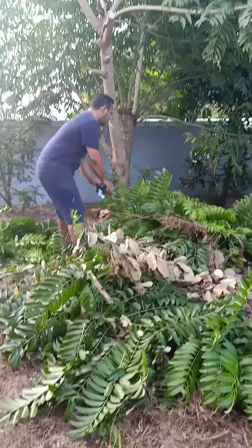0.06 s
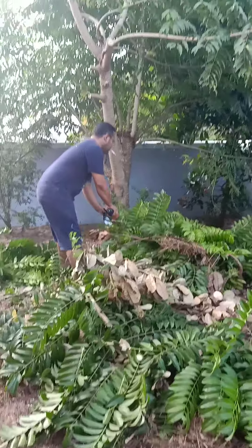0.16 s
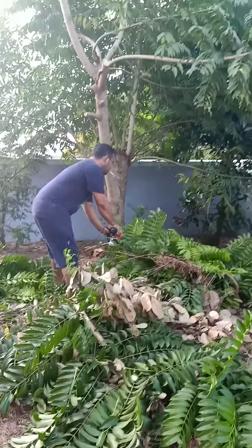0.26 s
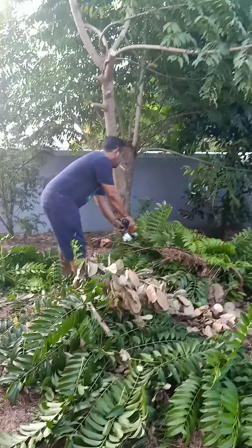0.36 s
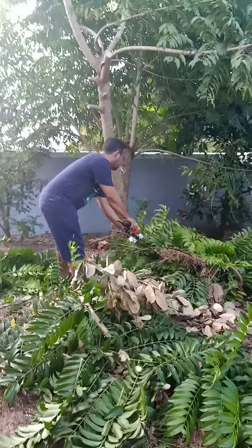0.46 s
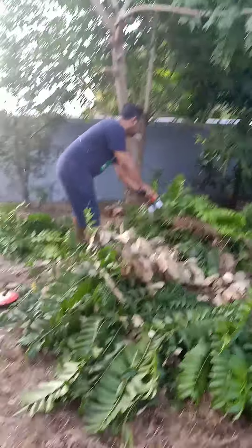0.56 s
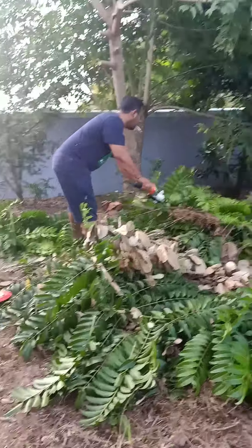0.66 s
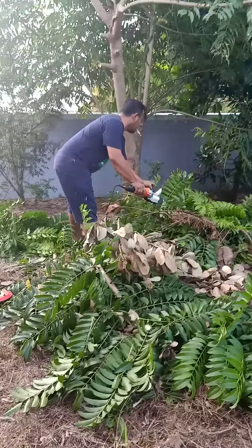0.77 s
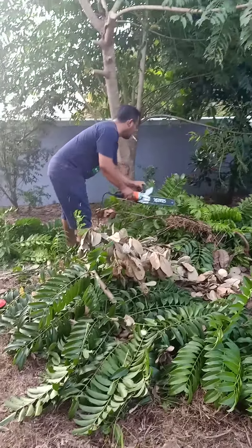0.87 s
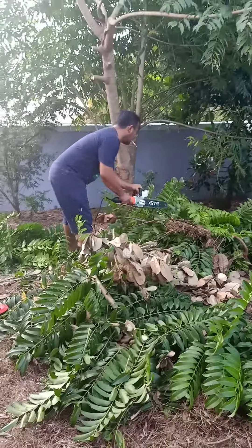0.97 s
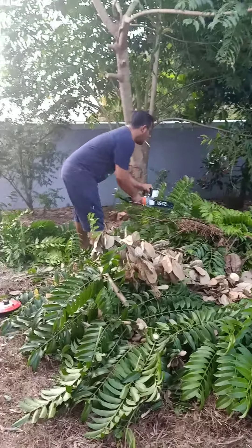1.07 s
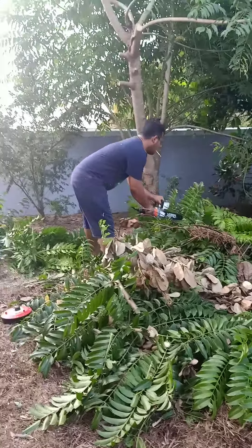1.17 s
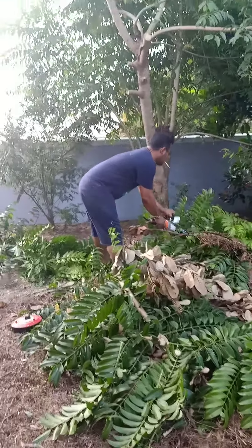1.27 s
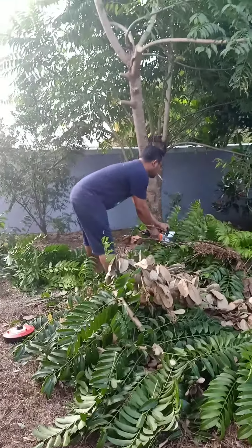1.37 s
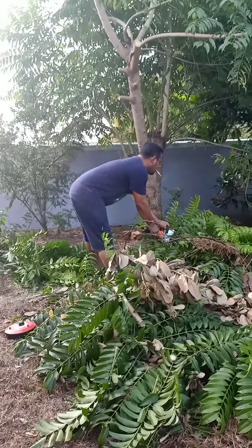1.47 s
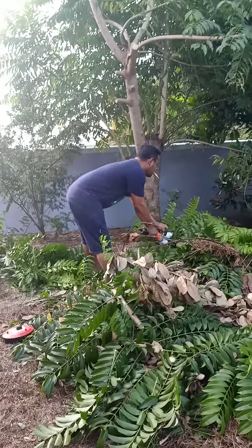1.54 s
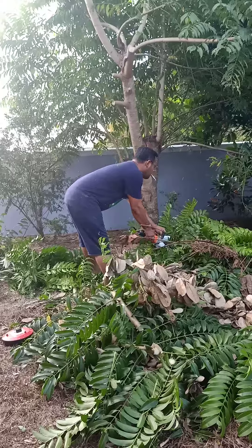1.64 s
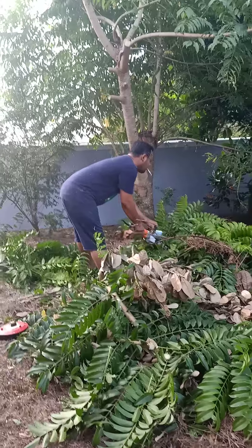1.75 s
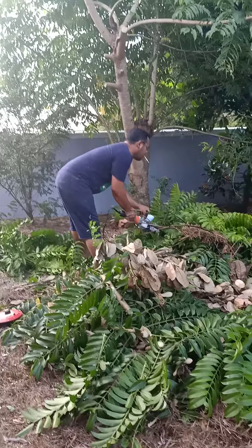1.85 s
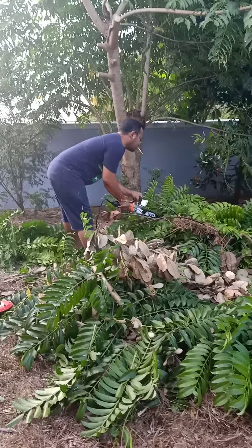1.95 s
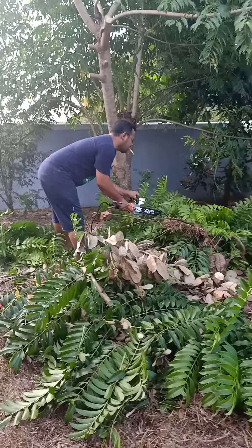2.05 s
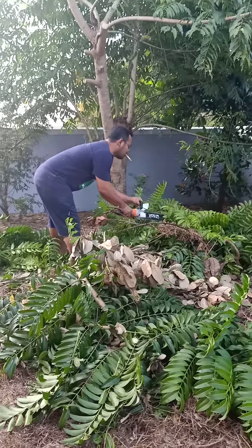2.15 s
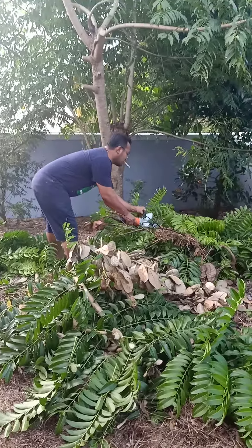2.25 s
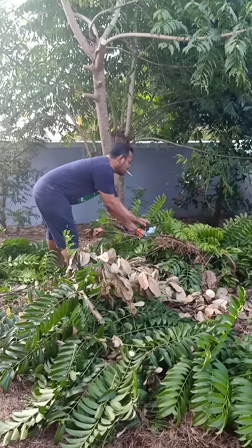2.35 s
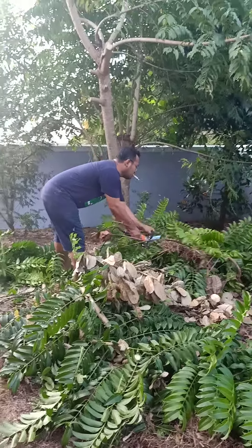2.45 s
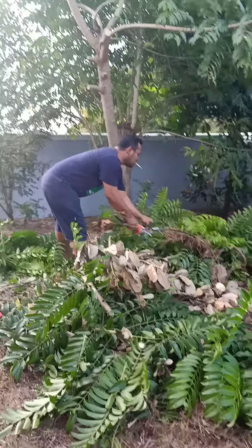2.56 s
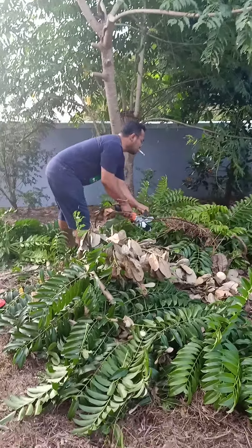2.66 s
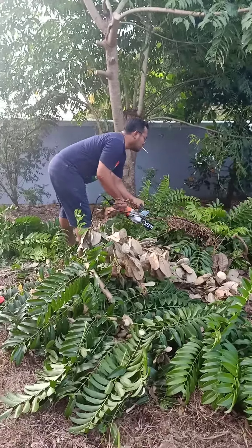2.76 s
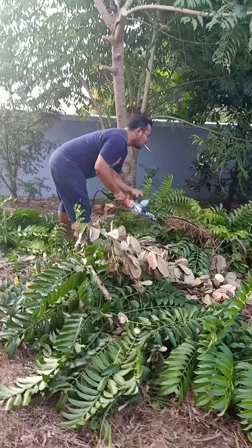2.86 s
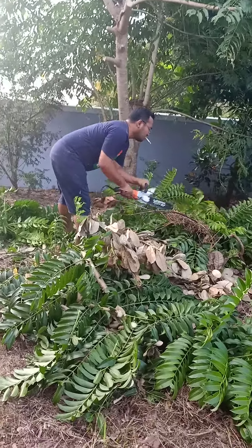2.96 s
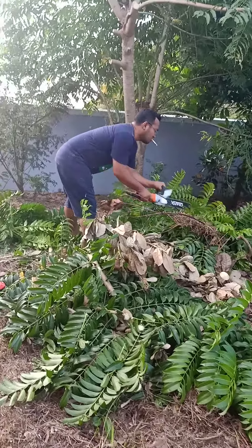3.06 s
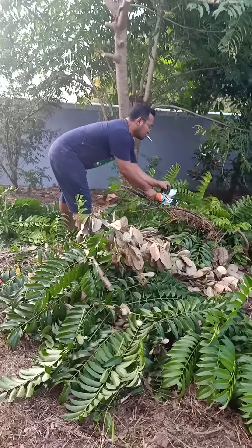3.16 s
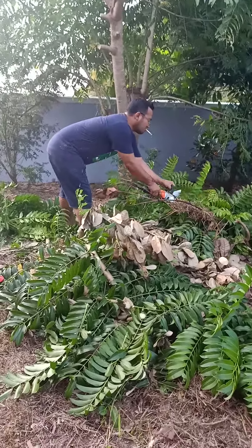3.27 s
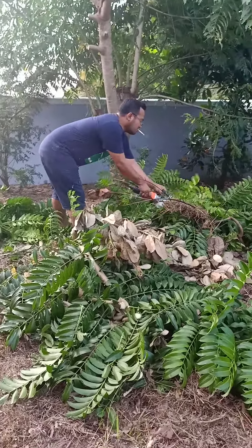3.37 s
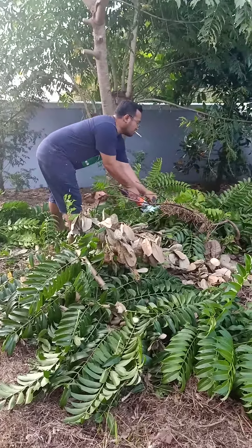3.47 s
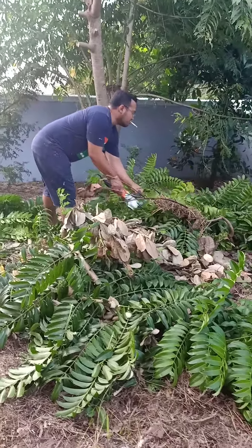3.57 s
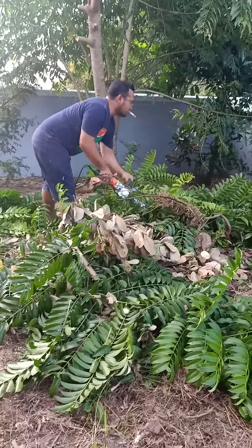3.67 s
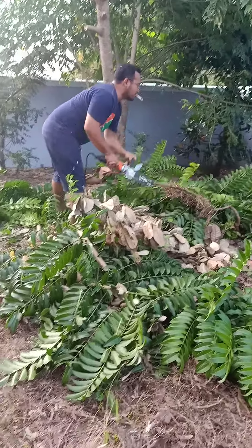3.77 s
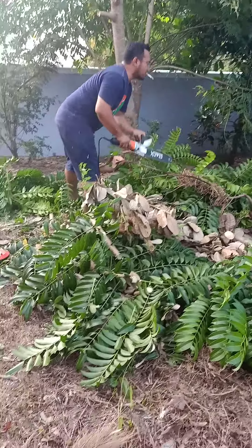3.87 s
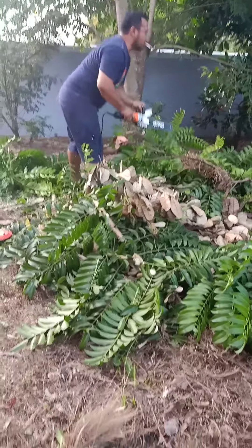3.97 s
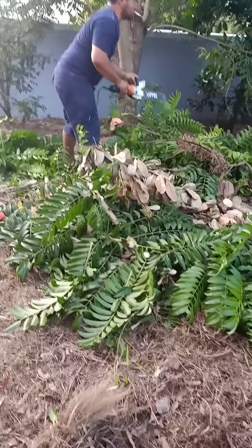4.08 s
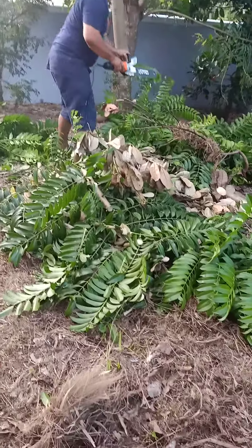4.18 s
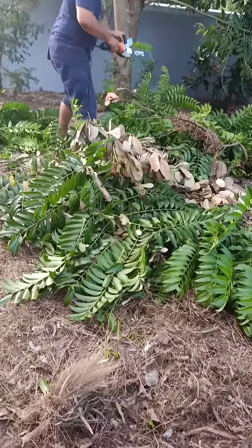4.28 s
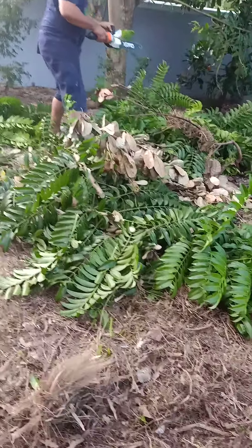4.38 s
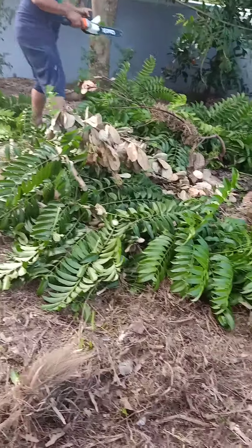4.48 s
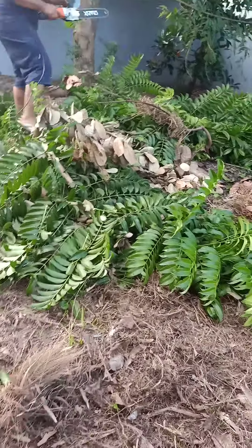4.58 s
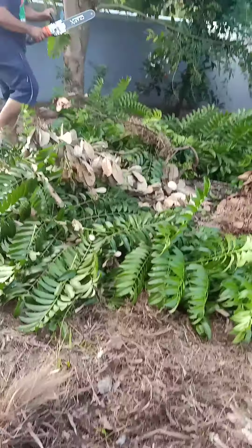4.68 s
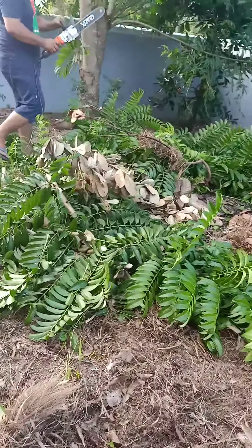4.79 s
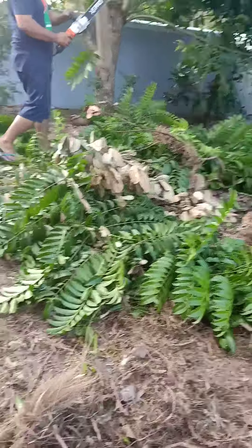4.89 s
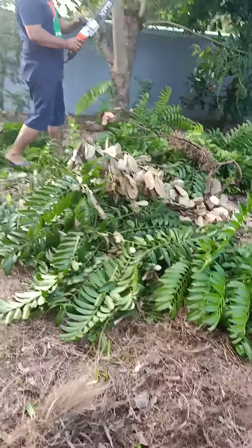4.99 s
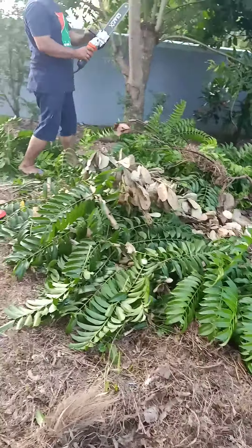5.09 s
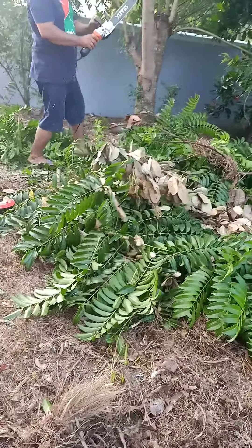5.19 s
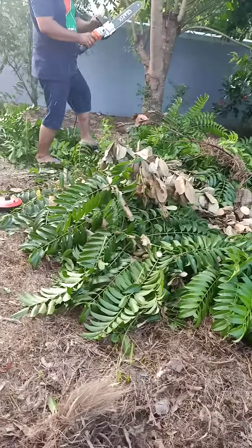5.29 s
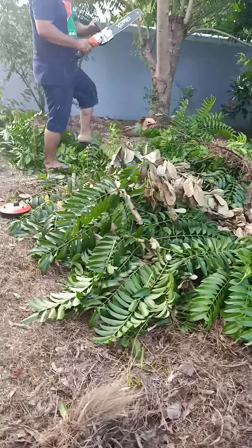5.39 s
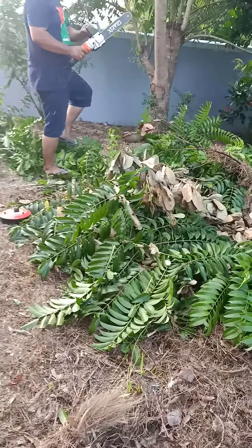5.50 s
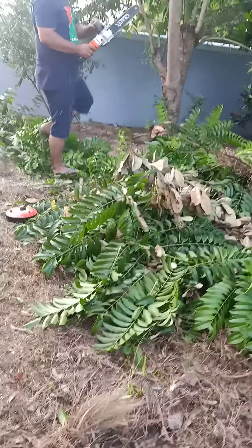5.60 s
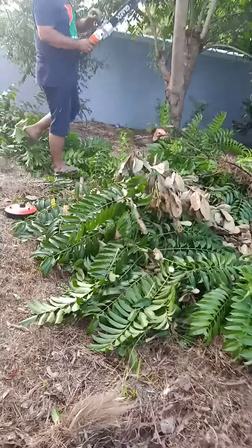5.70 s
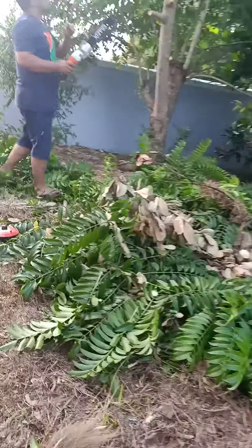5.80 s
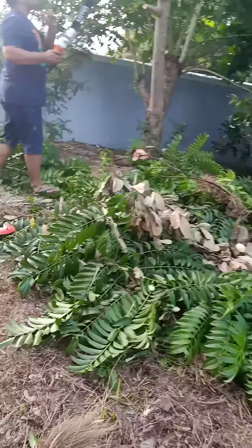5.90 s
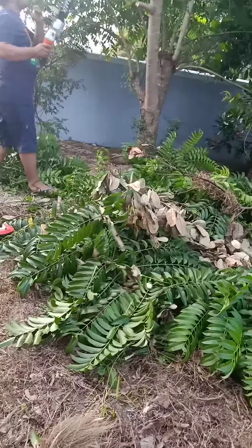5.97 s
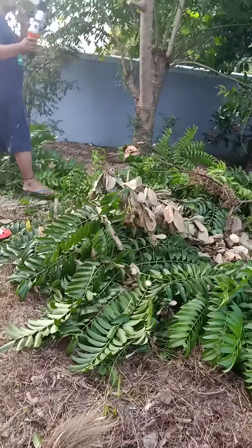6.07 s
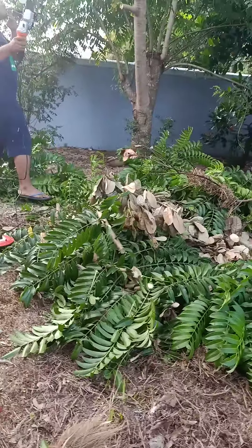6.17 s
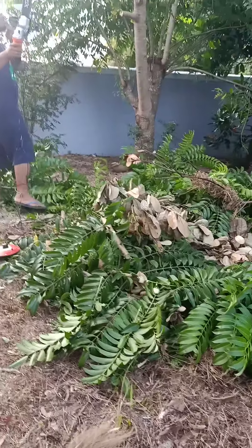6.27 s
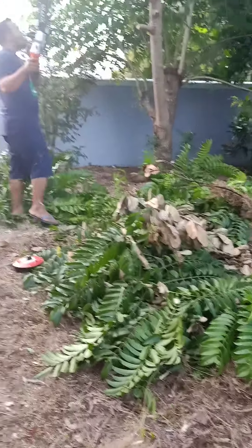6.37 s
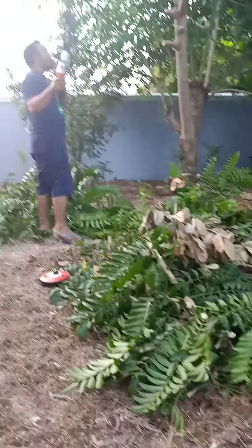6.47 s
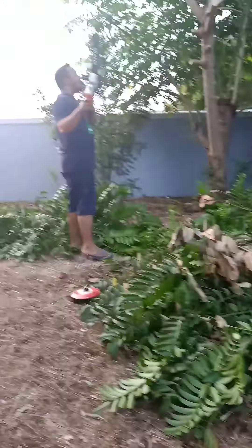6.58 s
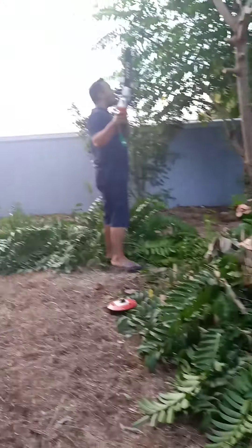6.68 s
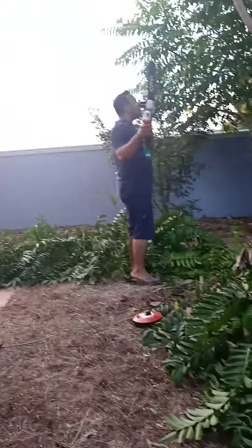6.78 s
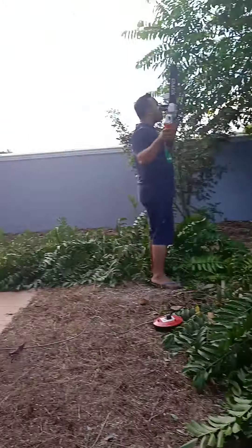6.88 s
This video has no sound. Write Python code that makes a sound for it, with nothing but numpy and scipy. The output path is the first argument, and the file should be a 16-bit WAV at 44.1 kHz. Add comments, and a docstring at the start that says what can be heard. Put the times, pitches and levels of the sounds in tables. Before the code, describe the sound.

Outdoors, a few metres from the microphone, a small electric chainsaw whines and rattles, making several short cuts through branches that knock and snap. After about four seconds the power is cut and the chain coasts, falling in pitch until it stops. Quiet footsteps crunch on leaves meanwhile, and a few faint bird chirps follow. Far traffic hums throughout, and a garden wall returns short echoes.

```python
"""In a walled garden, a small electric chainsaw cuts leafy branches a few metres away.
Its motor whines and slows in each cut, while the chain rattles round the steel bar and the teeth
chop at the wood. Then the trigger is let go and the saw coasts to a stop. Branches knock, twigs snap,
feet crunch on leaves and, near the end, birds whistle. Distant traffic hums all the while.
The wall and the leaves send the sound back as short echoes."""
import sys
import numpy as np
from scipy import signal
from scipy.fft import rfft, irfft, next_fast_len
from scipy.io import wavfile
from scipy.ndimage import map_coordinates

SR = 44100
rng = np.random.default_rng(int(sys.argv[2]) if len(sys.argv) > 2 else 0)


def generate_wav(signal):
    """Clip the signal to [-1, 1] and save it as 16-bit WAV at the path in sys.argv[1]."""
    frames = np.transpose(np.atleast_2d(signal))
    scaled = np.clip(frames, -1, 1) * 32767
    pcm = np.round(scaled).astype(np.int16)
    wavfile.write(sys.argv[1], SR, pcm)


N = 306054

# Levels in the tables are relative: filters and the mix still turn them up or down.
# Garden air and far traffic. Each row: frequency in Hz, level in dB.
AIR_SPECTRUM = [(25, -20), (55, -8), (92, 4), (130, 1), (300, -2.5), (550, -4), (900, -9), (1300, -15),
                (2300, -10), (4000, -22.5), (5800, -24), (7300, -14.5), (10000, -27.5), (15000, -42)]
# How alike the air sounds left and right. Each row: frequency in Hz, likeness (1 is the same).
AIR_LIKENESS = [(60, 1), (300, 0.86), (700, 0.48), (2000, 0.085), (6000, 0.071)]
# Distant engines. Each row: start and end in seconds, pitch in Hz, level in dB.
ENGINE_HUMS = [(0, 7, 107, -71), (0, 7, 200, -74), (.33, .97, 146, -64), (6.3, 7, 266, -65.5),
               (6.3, 7, 533, -72.5), (5, 6.3, 432, -71.5), (6.52, 6.85, 441, -70)]
# Bird notes. Each row: start and length in seconds, first and last pitch in Hz, level in dB,
# delay of the left side in milliseconds.
BIRD_NOTES = [(6.255, .03, 2550, 2300, -65, -.07), (6.275, .04, 2000, 1980, -66, -.07),
              (6.32, .055, 1500, 1850, -62, .2), (6.35, .04, 1880, 1990, -55, .16),
              (6.354, .045, 2000, 3150, -60, -.07), (6.378, .06, 1900, 1520, -61, .2),
              (6.385, .05, 3150, 2750, -60.5, -.07), (6.428, .04, 2550, 2780, -65, -.07),
              (6.452, .045, 2950, 3070, -61.5, -.07), (6.505, .035, 2420, 2200, -63, 0),
              (6.53, .05, 3400, 3850, -67, .04), (6.57, .045, 2200, 2360, -60, 0),
              (6.592, .03, 4050, 3350, -68, .04), (6.615, .035, 3250, 4050, -66, .04),
              (6.724, .046, 1950, 2420, -54, -.07), (6.752, .028, 2400, 2700, -57, -.07),
              (6.802, .015, 2350, 2480, -49, -.07), (6.808, .028, 2480, 3150, -56.5, -.05),
              (6.827, .04, 3170, 3020, -60, -.05)]
# Steps on fallen leaves. Each row: middle and half length in seconds, level in dB.
FOOTSTEPS = [(4.42, 0.11, -54), (4.74, 0.098, -58), (5.37, 0.09, -55.5), (5.944, 0.13, -57)]
# Branches knocking as they give way. Each row: start in seconds, level in dB, pitch in Hz.
BRANCH_KNOCKS = [(0.948, -45, 251), (1.517, -38.5, 346), (2.449, -42, 334), (2.58, -39, 311),
                 (3.419, -43, 414.7), (3.558, -40, 309.8)]
# Twigs and dry leaves snapping. Each row: start in seconds, level in dB.
TWIG_SNAPS = [(3.9114, -42), (3.952, -38), (6.0843, -58), (6.546, -47), (6.5614, -50)]

# How long the garden echoes. Each row: frequency in Hz, seconds to fade by 60 dB.
ECHO_TIMES = [(200, 0.077), (2000, 0.32), (12000, 0.33)]
# What wall and leaves send back. Each row: frequency in Hz, level in dB.
ECHO_SPECTRUM = [(200, -26), (700, -2.5), (2000, 1), (5000, 7), (12000, 4)]
# First echoes off ground, trunk and wall. Each row: delay in milliseconds, level in dB.
ECHO_PATHS = [(1.4, -7), (5.2, -13), (11, -7), (16, -6), (27, -10.5)]
# The saw moves to the right. Each row: time in seconds, delay of the left side in milliseconds.
SAW_DIRECTION = [(0, 0.028), (2.8, 0.017), (3.7, 0.036), (4.3, 0.16), (4.7, 0.25), (5.7, 0.2), (6.3, 0.18)]
# Each microphone opening rings in its own way. Each row: frequency in Hz, left minus right in dB.
MIC_BALANCE = [(300, -0.5), (650, 0), (900, -3), (1250, -2.5), (1650, 1.5), (2100, 0), (3500, -0.5),
               (5200, 0.5), (7100, 5.5), (8000, 3.5), (9000, -9.5), (10200, -2), (11300, -4), (12800, 1)]

# The tone colours of five things that get struck. Each row: frequency in Hz, level in dB.
WOOD_SPECTRUM = [(100, -44.5), (200, -11.5), (330, -5.5), (520, -5.5), (650, -7.5), (820, 1), (1100, 1),
                 (1700, -3.5), (3000, -21.5)]  # branches and twigs
HOUSING_SPECTRUM = [(300, -32.5), (620, -21.5), (760, -17), (1200, -15), (1500, -10), (1720, -4),
                    (1950, -1), (2350, 1.5), (2900, -1.5), (3350, -10), (3800, -8.5), (4500, -10.5),
                    (5600, -18), (8000, -39.5)]  # the plastic housing
STEEL_SPECTRUM = [(2500, -33), (3300, -13), (3800, -5.5), (4500, -5.5), (5400, -10.5), (6300, -7.5),
                  (7200, -2), (8600, -1), (9800, -5.5), (11200, -5.5), (12600, -11), (13500, -6),
                  (14800, -17.5), (15600, -5.5)]  # the chain on the steel bar
SLACK_SPECTRUM = [(2800, -36), (3400, -11.5), (3850, -2.5), (4400, -23.5), (7400, -4), (8500, 1),
                  (9200, -5.5), (10200, -25)]  # the bar, rung by the slack chain as it coasts
GEAR_SPECTRUM = [(400, -24), (850, -9), (1150, -1.5), (1450, -0.5), (2100, 3), (3400, -2.5), (4800, -3.5),
                 (5650, -4), (7100, -2), (10000, -26.5)]  # the gears under power
# Narrow bands where bar and cover ring. Each row: frequency and width in Hz, boost in dB.
SAW_RESONANCES = [(740, 36, 4), (1143, 43, -4), (1395, 51, 4.5), (1643, 54, 3), (1717, 32, 4.8),
                  (1810, 90, -0.5), (2316, 32, 2.5), (2350, 64, 1), (2950, 79, 1), (3710, 200, 1.2),
                  (5530, 300, -1), (7178, 110, 2), (7650, 300, -1), (10130, 200, 2.5)]
# The chain rasps on a twig or chatters in its groove.
# Each row: middle and half length in seconds, frequency and width in Hz, level in dB.
CHAIN_RASPS = [(0.434, .045, 1550, 900, -39), (1.05, 0.085, 2400, 800, -34), (1.64, .035, 950, 600, -42.5),
               (2.637, 0.024, 2040, 400, -31), (2.645, 0.018, 1663, 200, -38),
               (2.996, .04, 1750, 180, -37.5), (3.44, 0.03, 1250, 702.7, -43),
               (3.665, .02, 2379, 250.1, -36.5), (5.165, .018, 2050, 600, -46),
               (5.315, 0.019, 2550, 400, -45.5), (5.759, .018, 1900, 597.6, -48),
               (5.816, 0.022, 2196, 600, -55), (6.144, .02, 1706, 130, -61)]
# The steel sizzles as the flat of the bar swings towards the listener.
# Each row: middle and half length in seconds, level in dB.
BAR_SIZZLES = [(.97, .06, -43), (3.03, 0.034, -39.5), (3.99, 0.097, -35), (4.71, 0.068, -40)]
# The saw is dipped, lifted and turned. Each row: time in seconds, change of rattle and of hiss in dB.
CHAIN_TURNING = [(0, -3, 1), (.25, -1.5, -1.8), (.43, -.7, 1.5), (.8, 0.5, 0.3), (1, 0.9, 0.5),
                 (1.25, -0.7, -0.3), (1.58, -0.5, 0.5), (1.76, -2.5, -0.5), (2.03, -1.6, 1.2),
                 (2.5, 1.2, 0.5), (2.64, -1.2, -0.7), (2.76, -0.5, 0.5), (3.03, 0, 1.5), (3.3, 0, -0.5),
                 (3.55, -0.8, -0.4), (3.76, 1, 0.9), (3.99, 1, 1.3), (4.17, 0.5, 0.5), (4.5, -2, 1),
                 (4.8, 1.8, 2), (5.15, -2.2, 0), (5.6, -3.5, 0), (5.95, .6, 1.5), (6.08, -.3, -1),
                 (6.22, -3, -1)]
# Gritty gear tones. Each row: multiple of the shaft speed, level at full speed in dB.
GEAR_PARTIALS = [(3.65, -51), (5.0, -47), (5.3, -49.5), (6.25, -49.5)]
# Three motor tones swell and sink as the saw is turned. Each row: time in seconds, level in dB.
SHAFT_LEVELS = [(0, -63), (.25, -61), (.54, -54.5), (.75, -64), (.98, -53), (1.12, -60), (1.3, -58),
                (1.45, -66), (1.68, -67), (1.82, -55), (2, -62), (2.6, -58.5), (3.03, -56), (3.38, -58.5),
                (3.52, -64), (3.72, -55.5), (4, -56), (4.23, -49.5), (4.4, -57)]  # one wave per turn of the shaft
OCTAVE_LEVELS = [(.06, -55), (.17, -48), (.3, -47), (.53, -47.5), (.66, -63), (.88, -60), (1.03, -50.5),
                 (1.25, -54), (1.5, -59), (1.8, -52.5), (2.15, -50), (2.5, -51.5), (2.85, -48), (3.12, -62),
                 (3.35, -47.5), (3.55, -57), (4.15, -54.5), (4.35, -60)]  # two waves per turn
WHISTLE_LEVELS = [(0, -47), (.27, -41), (.45, -48), (.6, -48), (.72, -41), (.88, -43), (1.02, -39.5),
                  (1.15, -45), (1.35, -40.5), (1.7, -52), (2.0, -44), (2.2, -42), (2.34, -45), (2.42, -36),
                  (2.56, -49), (2.74, -48), (2.87, -40), (3.15, -42), (3.35, -39.5), (3.6, -51),
                  (3.95, -42), (4.2, -43)]  # the commutator, the motor's spinning contact
# Weaker motor tones. Each row: multiple of the shaft speed, level against the octave in dB.
MOTOR_OVERTONES = [(3, -4), (12, -3)]
# The chain meets a branch and drags the motor down. Each row: start and length in seconds,
# speed lost in turns per second, recovery time in seconds, strength of the bite in dB.
BRANCH_CUTS = [(-.5, .15, 16, 0.75, -38), (0.34, .13, 13.4, 1.24, -42.5), (1.37, 0.13, 3.3, 0.29, -51),
               (1.512, 0.19, 23.5, 0.66, -49.5), (2.171, 0.23, 5, 0.57, -64),
               (2.466, .12, 18.8, 0.84, -41.5), (3.402, .18, 17, 0.64, -43.5)]

FREE_HZ = 471.3  # shaft turns per second when nothing is being cut
RELEASE_S, STOP_S = 4.18, 6.3  # the trigger is let go; the coasting ends


def amp(db):
    """Turn decibels into a gain."""
    return 10 ** (np.asarray(db) / 20)


def unit(x):
    """Scale a sound to an average power of 1."""
    return x / np.sqrt(np.mean(x ** 2) + 1e-20)


def clock():
    """The time of every sample in seconds."""
    return np.arange(N) / SR


def along(points, hz):
    """Read between the rows of a (frequency, value) table, on a log frequency scale."""
    freqs, values = np.transpose(points)
    return np.interp(np.log(hz + 1), np.log(freqs + 1), values)


def curves(rows):
    """Join timed rows with straight lines: one curve for each column after the time."""
    times, *columns = np.transpose(rows)
    return [np.interp(clock(), times, column) for column in columns]


def wobble(rate):
    """A smooth random curve through `rate` random points a second."""
    knots = rng.standard_normal(int(N * rate / SR) + 4)
    fine = signal.resample(knots, 10 * len(knots))
    return unit(np.interp(clock() * rate * 10, np.arange(len(fine)), fine))


def swell(middle, half_length, db):
    """A bell-shaped rise and fall of gain."""
    return amp(db) * np.exp(-((clock() - middle) / half_length) ** 2)


def phase(hz):
    """The running angle of a wave whose pitch changes."""
    return 2 * np.pi * np.cumsum(hz) / SR


def filtered(x, response):
    """Filter x; `response` gives the gain at each frequency."""
    size = next_fast_len(N + SR // 2)
    return irfft(rfft(x, size) * response(np.fft.rfftfreq(size, 1 / SR)), size)[..., :N]


def resonance(f, hz, width_hz):
    """How something that rings at `hz` responds to the frequencies f."""
    return 1j * f * width_hz / (hz * hz - f * f + 1j * f * width_hz)


def band(x, hz, width_hz):
    """Pass x through a steep resonance; the result has power 1."""
    return unit(filtered(x, lambda f: resonance(f, hz, width_hz) ** 2))


def body(x, spectrum):
    """Let x ring an object with the given tone colour; the result has power 1."""
    size = 4096
    hz = np.fft.rfftfreq(size, 1 / SR)
    gain = amp(along(spectrum, hz)) * np.clip(hz / spectrum[0][0], 1e-2, 1)
    # folding the cepstrum makes the ring come after each blow, never before it
    cepstrum = irfft(np.log(gain))
    cepstrum[1:size // 2] *= 2
    cepstrum[size // 2 + 1:] = 0
    ring = irfft(np.exp(rfft(cepstrum)))
    return unit(signal.fftconvolve(x, ring)[:N])


def impacts(rate, scatter, size_db, sliding):
    """Uneven blows, `rate` a second, each a short scrape, over a share of steady sliding noise."""
    count = np.cumsum(rate) / SR
    beats = np.arange(1, int(count[-1]))
    at = np.interp(beats + scatter * rng.standard_normal(len(beats)), count, np.arange(N)).astype(int)
    sizes = amp(size_db * rng.standard_normal(len(at)))
    energy = np.bincount(at, sizes ** 2 / rate[at], N)
    energy = signal.lfilter([1], [1, -np.exp(-1 / (0.00028 * SR))], energy)
    return np.sqrt(sliding + (1 - sliding) * energy / energy.mean()) * rng.standard_normal(N)


def air():
    """A soft outdoor rush, with engines droning far away."""
    def colour(hz):
        spread = np.arccos(np.clip(along(AIR_LIKENESS, hz), -1, 1)) / 2
        return amp(along(AIR_SPECTRUM, hz)) * [np.cos(spread), np.sin(spread)]

    mid, side = filtered(rng.standard_normal((2, N)), colour)
    out = amp(-61.5 + 0.63 * wobble(2.9)) * unit(np.array([mid + side, mid - side]))
    for start, end, hz, db in ENGINE_HUMS:
        present = np.clip(np.minimum(clock() - start, end - clock()) / 0.095, 0, 1)
        out += present * amp(db + 2 * wobble(9)) * np.sin(phase(hz + 2 * wobble(14)))
    return out


def birds():
    """Quick sliding whistles from several places in the trees, with a soft echo off trunks and wall."""
    near_db, pan_db, echo_db, echo_s = -60, -1.4, -2.5, .3
    song, straight = np.zeros(N + SR), np.zeros((2, N + SR))
    for start, length, start_hz, end_hz, db, lag_ms in BIRD_NOTES:
        progress = np.linspace(0, 1, round(length * SR))
        quaver = 1 + .032 * wobble(400)[:len(progress)]
        hz = quaver * (start_hz + (end_hz - start_hz) * np.sin(np.pi / 2 * progress) ** 1.3)
        note = amp(db) * np.sin(np.pi * progress) * np.sin(phase(hz))
        song[round(start * SR):][:len(note)] += note
        hidden_db = .35 * min(db - near_db, 0)  # weak notes come from deeper in the trees
        for channel, side in enumerate((.5, -.5)):
            at = round((start + side * lag_ms / 1000) * SR)
            straight[channel, at:][:len(note)] += amp(hidden_db + side * pan_db) * note
    t = np.arange(SR // 3) / SR
    tail = rng.standard_normal((2, len(t))) * amp(-60 * t / echo_s) * np.clip(t / .02, 0, 1)
    echo = signal.fftconvolve(song[None], tail / np.linalg.norm(tail[0]), axes=1)
    return straight[:, :N] + amp(echo_db) * echo[:, :N]


def garden_echo(x):
    """The wall and countless leaves return a blur of sound; each band fades at its own pace."""
    size = 256
    hz, t, bands = signal.stft(x, SR, nperseg=size)
    kept = amp(-60 * t[1] / along(ECHO_TIMES, hz)) ** 2  # share of energy left after each time step
    energy = np.array([signal.lfilter([0, 1 - k], [1, -k], power)
                       for k, power in zip(kept, np.abs(bands) ** 2)])
    noise = signal.stft(rng.standard_normal((2, N)), SR, nperseg=size)[2]
    shaped = noise * np.sqrt(energy / np.mean(np.abs(noise) ** 2))
    wash = signal.istft(shaped, SR, nperseg=size)[1][:, :N]
    return filtered(wash, lambda f: amp(along(ECHO_SPECTRUM, f) - 2.5))


def reflections(x):
    """The first echoes: their paths drift as the saw is moved, so the tone colour keeps shifting."""
    out = np.zeros((2, N))
    for delay_ms, db in ECHO_PATHS:
        drift_ms = .12 * wobble(2.5) + .05 * delay_ms * wobble(.5)
        skew_ms = 0.2005 * wobble(.7)  # each arrives from its own direction
        for channel, side in enumerate((-1, 1)):
            late_s = (delay_ms + drift_ms + side * skew_ms) / 1000
            out[channel] += amp(db) * map_coordinates(x, [(clock() - late_s) * SR], order=2)
    return out


def straight_path(x):
    """Sound coming straight from the saw reaches the right side first."""
    lag_ms, = curves(SAW_DIRECTION)
    shift = lag_ms * SR / 1000 / 2
    return np.array([map_coordinates(x, [np.arange(N) + side * shift], order=4) for side in (-1, 1)])


def steps():
    """Each step presses twigs and fallen leaves with a soft, woody crunch."""
    twigs = impacts(np.full(N, 400), scatter=.3, size_db=2, sliding=.7)
    return sum(swell(*row) for row in FOOTSTEPS) * body(twigs, WOOD_SPECTRUM)


def branches():
    """Branches give way with dull knocks; twigs snap brightly inside a brief rustle of leaves."""
    knocks, snaps = np.zeros((2, N + SR))
    t = np.arange(SR // 4) / SR
    for start, db, hz in BRANCH_KNOCKS:
        level = amp(db - 60 * t / 0.098) * (1 - np.exp(-t / 0.0018))
        knocks[round(start * SR):][:len(t)] += level * np.sin(2 * np.pi * hz * t)
    for start, db in TWIG_SNAPS:
        at = round(start * SR)
        snaps[at:][:len(t)] += amp(db - 60 * t / 0.008) * rng.standard_normal(len(t))
        rustle = amp(-60 * np.abs(t - t.mean()) / 0.089) * rng.standard_normal(len(t))
        snaps[at - len(t) // 2:][:len(t)] += amp(db - 15.5) * rustle
    return knocks[:N] + filtered(snaps[:N], lambda f: resonance(f, hz=8000, width_hz=11000) ** 2)


def shaft_speed():
    """Turns per second: each cut slows the motor; with the trigger let go, drag and friction brake it."""
    t, speed = clock(), np.full(N, FREE_HZ)
    for start, length, sag, recovery, _ in BRANCH_CUTS:
        recovering = np.clip(1 - (t - start - length) / recovery, 0, 1) ** 1.3
        speed -= sag * np.clip((t - start) / length, 0, 1) * recovering
    drag_s = 1.62
    friction = np.exp((RELEASE_S - STOP_S) / drag_s)
    coasting = (np.exp((RELEASE_S - t) / drag_s) - friction) / (1 - friction)
    return speed * np.clip(coasting, .01, 1)


def speed_db(speed):
    """The speed in dB against the free-running motor."""
    return 20 * np.log10(speed / FREE_HZ)


def bite_strength():
    """The teeth catch just before the motor slows, tear hardest early in the cut, then ease off."""
    lead_s, attack_s, hold_share, fade_s = 0.038, 0.033, 0.55, 0.24
    t, strength = clock(), np.zeros(N)
    for start, length, _, _, db in BRANCH_CUTS:
        catching = np.clip((t - start + lead_s) / attack_s, 0, 1)
        easing = np.exp(-np.maximum(t - start - hold_share * length, 0) / fade_s)
        strength += amp(db) * catching * easing
    return strength


def cutting(speed):
    """Teeth, one for every few links, chop at the branch; the free chain clatters more softly."""
    clatter = amp(-48 + 1.05 * speed_db(speed))
    teeth = impacts(.4 * speed + 60, scatter=.2, size_db=1.5, sliding=0.47)
    return np.hypot(bite_strength(), clatter) * body(teeth, WOOD_SPECTRUM)


def rasps(speed):
    """Bursts of hard tooth strikes ring one part of the saw or wood; the bar adds bright sizzles."""
    teeth = impacts(.4 * speed + 60, scatter=.15, size_db=2, sliding=.35)
    rasping = sum(swell(middle, half_length, db) * band(teeth, hz, width_hz)
                  for middle, half_length, hz, width_hz, db in CHAIN_RASPS)
    links = impacts(1.6 * speed + 90, scatter=.22, size_db=3, sliding=.3)
    return rasping + sum(swell(*row) for row in BAR_SIZZLES) * band(links, hz=8720, width_hz=1400)


def gear_tones(speed):
    """Driven gears sing roughly: the play between their teeth scatters pitch and level."""
    out = np.zeros(N)
    for multiple, db in GEAR_PARTIALS:
        angle = phase(multiple * speed * (1 + .012 * wobble(300)))
        out += amp(db + 3 * wobble(120)) * np.sin(angle)
    return np.sqrt(2) * out * (speed / FREE_HZ) ** 6


def ringing(x):
    """Bar and cover lift or dip narrow bands, now more, now less, as the saw is turned."""
    out = x
    for hz, width_hz, db in SAW_RESONANCES:
        ring = filtered(x, lambda f: resonance(f, hz, width_hz))
        out = out + (amp(db) - 1) * (1 + .45 * wobble(4)) * ring
    return out


def chain(speed):
    """Links strike the drive wheel and bar, shaking the housing; the ticks thin out as the chain slows."""
    rattle_turn_db, hiss_turn_db = curves(CHAIN_TURNING)
    bite = bite_strength()
    load = bite / bite.max()  # wood in the chain shakes the housing
    shake_db = 0.9 * speed_db(speed) + 0.4 * load + rattle_turn_db
    hiss_db = -32.5 + 1.113 * speed_db(speed) + hiss_turn_db
    links = impacts(1.62 * speed + 90, scatter=.22, size_db=2.5, sliding=0.28)
    flap_db = 0.24 * wobble(45) + .5 * wobble(110)  # the slack chain flaps on the bar
    lumps_db = 0.49 * wobble(70) + 2.5 * (1 - speed / FREE_HZ) * wobble(45)  # more so when coasting
    rattle = amp(-34.5 + shake_db + flap_db + lumps_db) * body(links, HOUSING_SPECTRUM)
    drive = (speed / speed.max()) ** 2.68  # gear noise fades faster than the rattle
    sway_db = 0.18 * wobble(30)  # the saw shakes in the hands
    hiss = amp(hiss_db + flap_db + sway_db - 2.0 * (1 - drive)) * body(links, STEEL_SPECTRUM)
    slack = impacts(1.8 * speed + 90, scatter=0.22, size_db=4.0, sliding=0.61)
    bar = amp(hiss_db + flap_db - 4) * (1 - drive) * body(slack, SLACK_SPECTRUM)
    gear_ticks = impacts(4 * speed + 60, scatter=0.39, size_db=3.5, sliding=0.57)
    gears = amp(-38 + shake_db) * drive * body(gear_ticks, GEAR_SPECTRUM)
    running = np.clip((6.35 - clock()) / 0.048, 0, 1)
    return running * (rattle + hiss + bar + gears)


def motor(speed):
    """The shaft sings, weakening and shuddering in the cuts; the commutator adds a thin whistle."""
    shaft_db, = curves(SHAFT_LEVELS)
    octave_db, = curves(OCTAVE_LEVELS)
    whistle_db, = curves(WHISTLE_LEVELS)
    load = np.clip((FREE_HZ - speed) / 20, 0, 1) ** 2 * (clock() < RELEASE_S)
    shaft_db += 8 * speed_db(speed) - load  # a full load takes off 1 dB
    octave_db += 2 * speed_db(speed) - load
    unsteady = 1 + .001 * wobble(40) + .003 * wobble(220)
    angle = phase(speed * unsteady)
    shudder = phase(speed * .011 * (.25 + load) * wobble(90))
    slowing = np.minimum(1 - speed / FREE_HZ, .15)  # the coasting rotor rattles, so its tones break up
    flutter_db = 1.8 + 2 * load + 14 * slowing

    def tone(multiple, db):
        return amp(db + flutter_db * wobble(40)) * np.sin(multiple * (angle + shudder))

    tones = tone(1, shaft_db) + tone(2, octave_db)
    for multiple, db in MOTOR_OVERTONES:
        tones += tone(multiple, octave_db + db)
    whistle = amp(whistle_db + 3.2 * wobble(45)) * np.sin(24 * angle)
    powered = np.clip((4.26 - clock()) / .06, 0, 1)  # the whistle stops with the current
    singing = np.clip((4.95 - clock()) / .35, 0, 1)
    return np.sqrt(2) * (singing * tones + powered * whistle)


def scene():
    """Mix saw, branches and steps with their echoes, the birds and the air."""
    speed = shaft_speed()
    saw = ringing(chain(speed)) + cutting(speed) + rasps(speed) + gear_tones(speed)
    work = amp(-3) * (saw + branches() + steps())
    whine = motor(speed)
    wash = garden_echo(work + amp(-11) * whine)
    return straight_path(work + whine) + reflections(work) + wash + birds() + air()


def record(dry):
    """Each microphone opening colours the sound in its own way; the highest treble is cut off."""
    def response(hz):
        top_hz = 15630
        passband = np.clip((top_hz - hz) / 200 + .5, 0, 1)
        return amp(np.outer([.5, -.5], along(MIC_BALANCE, hz))) * passband

    return filtered(dry, response)


dry = scene()
out = record(dry)
generate_wav(out)
```